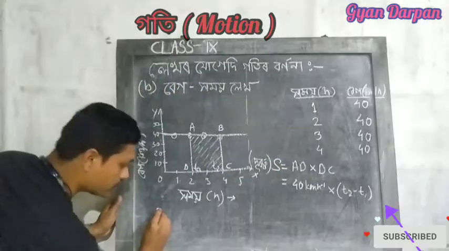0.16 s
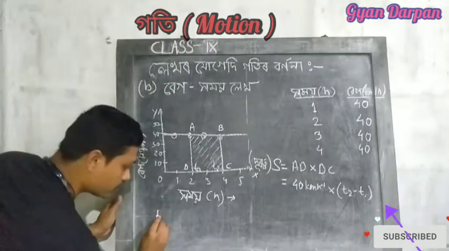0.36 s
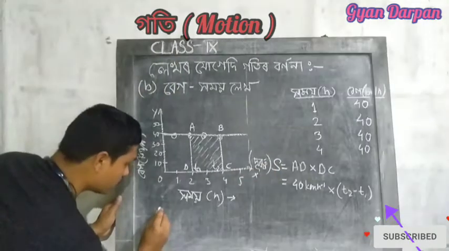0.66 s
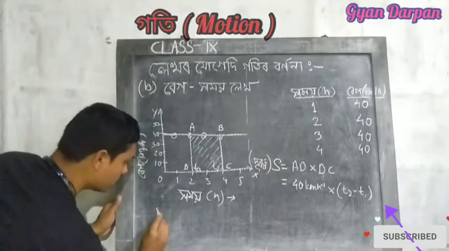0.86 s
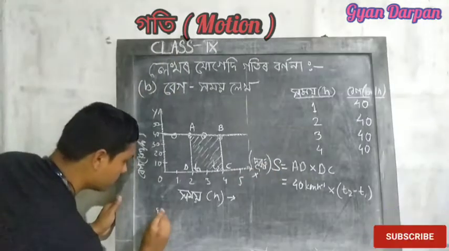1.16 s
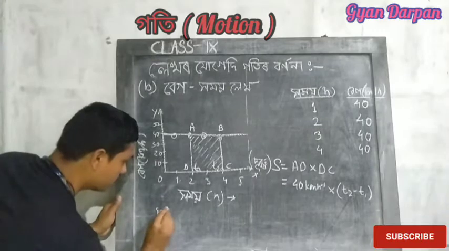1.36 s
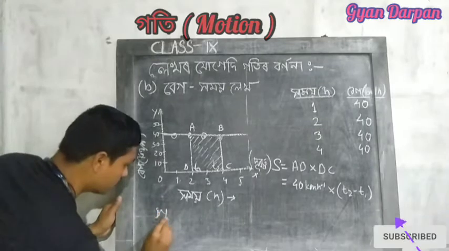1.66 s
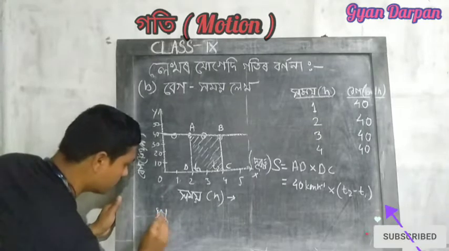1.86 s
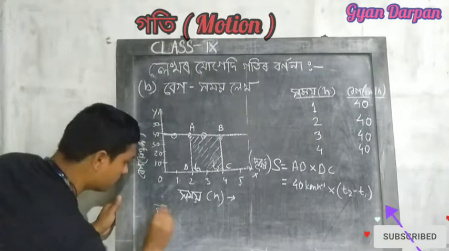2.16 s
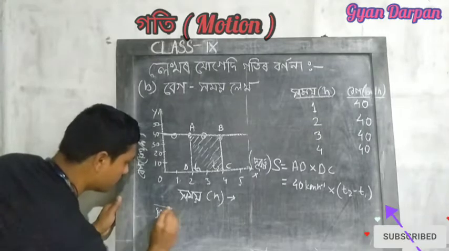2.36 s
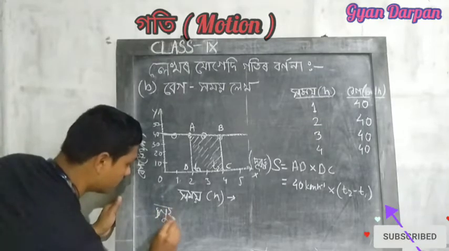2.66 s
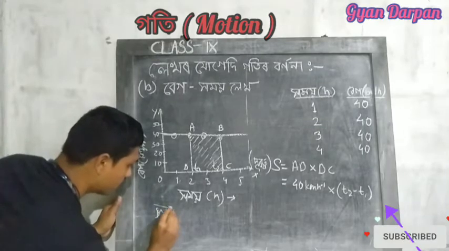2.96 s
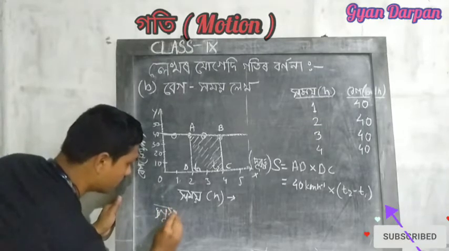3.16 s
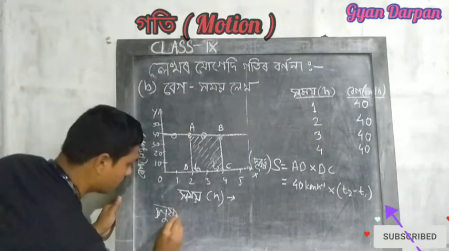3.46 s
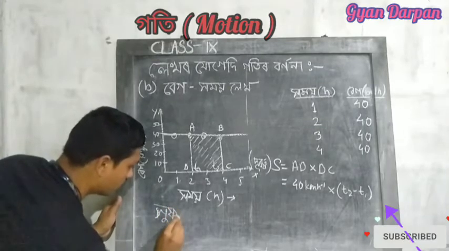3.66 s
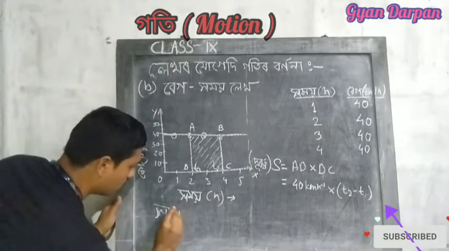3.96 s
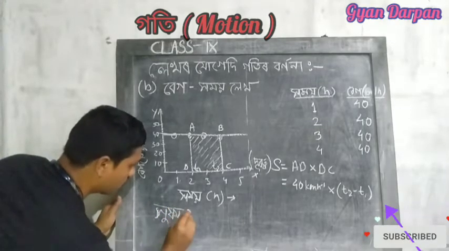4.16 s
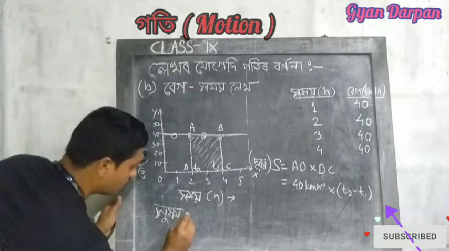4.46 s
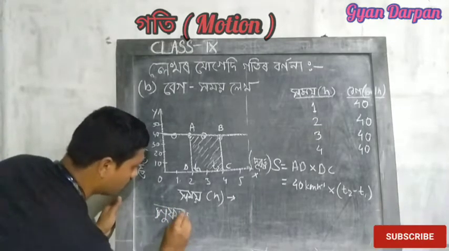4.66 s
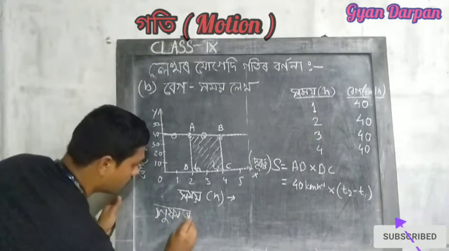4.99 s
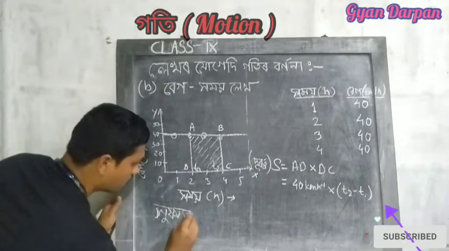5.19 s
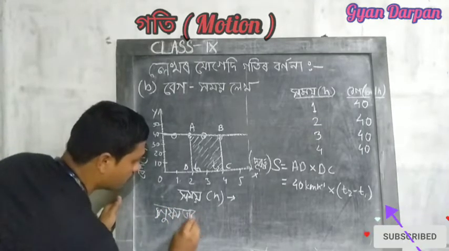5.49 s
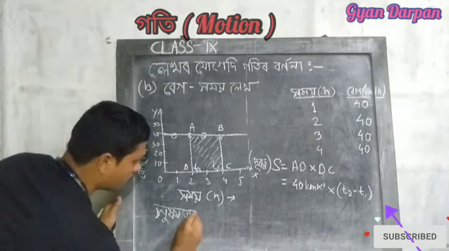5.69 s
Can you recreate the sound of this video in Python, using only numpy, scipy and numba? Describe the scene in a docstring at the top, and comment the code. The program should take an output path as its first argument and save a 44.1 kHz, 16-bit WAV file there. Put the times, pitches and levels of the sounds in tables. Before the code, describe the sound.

Chalk writes on a wooden blackboard in a small, bare room. It lands with sharp clicks and light knocks, often bouncing once, then drags in short, softer strokes that hiss and rasp, a few with a slight judder. Taps and scrapes alternate irregularly for about six seconds with brief, nearly silent gaps. A single microphone picks it up with a little room reverberation and limited bass and top end.

```python
"""A chalk stick writes on a wooden blackboard in a small bare room, heard by one narrow-band microphone.
Friction crushes grains, which hiss at the tip and force the modes of board and stick; stick-slip motion
makes the board judder. Each landing or bounce is an impact that leaves the same modes ringing freely.
The walls reverberate. Between strokes there is near silence, with a faint two-band chirr now and then."""
import sys
import numpy as np
from scipy import signal
from scipy.fft import rfft, irfft, next_fast_len
from scipy.io import wavfile
from numba import njit

SR = 44100
rng = np.random.default_rng(int(sys.argv[2]) if len(sys.argv) > 2 else 0)


def materialize(psi):
    """Save the field psi as 16-bit PCM at rate SR to the path in sys.argv[1].

    A 1-D psi becomes a single channel; in a 2-D psi each row is a channel.
    """
    bounded = np.clip(np.atleast_2d(psi).T, -1, 1)
    quanta = np.round(bounded * 32767).astype(np.int16)
    wavfile.write(sys.argv[1], SR, quanta)


N = 257279

# normal modes of board and stick: f/Hz, level/dB, nominal decay time/s (contact shortens it)
MODES = [(103, 1, 0.05), (151, -3, 0.22), (188, -7, 0.36), (225, 0.5, 0.25), (240, 1, 0.073),
         (385.3, 3, 0.14), (407.6, 0.5, 0.17), (480.7, -3.5, 0.05), (570, -6.5, 0.047), (739, -3.5, 0.052),
         (838, -3, 0.14), (866, -5, 0.14), (1012, -3.5, 0.095), (1058, -4.5, 0.083), (1181, -2, 0.087),
         (1321, -10, 0.054), (1413, -11, 0.1), (1543, -11, 0.14), (1700, -11.5, 0.071), (1982, -0.5, 0.14),
         (2275, 4.5, 0.058), (2640, 3.5, 0.076), (2890, -0.5, 0.052), (3270, -6, 0.056), (3250, -1, 0.0087),
         (3480, -7.5, 0.018), (3920, -14, 0.015), (4100, -13.5, 0.0098)]
THUD_TOP_HZ, BOARD_TOP_HZ = 480, 1800  # upper limits of the two lower mode families
BOARD_PIVOT_HZ, STICK_PIVOT_HZ = 900, 2600  # spectral tilts turn about these


def chalk_strokes():
    """Friction as a source: breaking grains and stick-slip motion drive resonances under a varying grip."""
    (hiss, rasp, scrape, judder), (judder_hz, board_tilt, stick_tilt) = hand_motion()
    fine, coarse = grains(per_s=9000, spread_db=2.5), grains(per_s=3000, spread_db=2.5)
    grip = undb(0.99 * walk(45) + 0.21 * walk(220))
    slips = undb(-9.5) * stick_slip(judder_hz) + unit(coarse)
    low, board, stick = forced_modes(slips, coarse, fine, judder_hz, board_tilt, stick_tilt)
    return grip * (hiss * tip_hiss(fine) + judder * low + scrape * board + rasp * stick)


def hand_motion():
    """Incoherent addition: strokes sum in power, which also weights their judder rate and tilts."""
    # t/s, duration/s, share of it to top speed, rise exponent, fall exponent, hiss level/dB,
    # rasp, scrape and judder level/dB re hiss, pressure change/dB, judder f/Hz,
    # board and stick tilt/(dB per octave)
    strokes = [(0.256, 0.25, 0.5, 0.57, 2.9, -50.5, -2, 3.5, 0.5, 0.5, 283, 0, 3),
               (0.809, 0.22, 0.61, 0.86, 0.62, -44.5, -3.5, 2, -4, -0.5, 283, 0, 4.5),
               (1.009, 0.26, 0.474, 3.6, 5.7, -43, -2.5, 6, 2.5, 9.5, 225.0, 1, 1.5),
               (1.227, 0.16, 0.37, 1.2, 1.93, -43, -1, -0.5, -3.5, -0.5, 346.1, 2, 2),
               (1.313, 0.18, 0.39, 3.4, 3.74, -48.5, 1.5, 7, 8.5, 3.5, 220.5, -3, -11.5),
               (1.48, 0.1773, 0.57, 1.16, 1.5, -41.5, -3.5, -1, -2.5, 0, 321, 0.5, 2),
               (1.634, 0.19, 0.2, 1.65, 1.3, -48, -2, 3, 7.5, 0.5, 263.3, -4.5, -6.5),
               (1.728, 0.17, 0.43, 1.3, 2.27, -45.5, -1, -1, -6.5, 15.5, 344.8, -6, 3.5),
               (1.866, 0.046, 0.5, 1.5, 2.5, -72, 14.5, 14, 9, 1.5, 370.6, -8, 1.5),
               (2.165, 0.2, 0.48, 1.6, 1.92, -37, -1.5, -1, -9.5, 13, 379.8, -0.5, 0),
               (2.354, 0.024, 0.3, 5, 2.7, -59.5, 7, -5, 15.5, -3, 317, 0.5, 0.5),
               (2.439, 0.16, 0.38, 0.75, 0.41, -46, -2.5, -6.5, -7, 4, 249.4, -2.5, 6.5),
               (2.623, 0.165, 0.44, 0.96, 3.3, -45, -3.5, -1.5, -3.5, 14.5, 361.9, -5.5, 3.5),
               (2.792, 0.21, 0.44, 1.6, 0.83, -44.5, -0.5, 6, 15.5, 0.5, 188.2, -4.5, -5),
               (3.071, 0.155, 0.23, 0.71, 0.51, -47.5, -1, -2.5, -13.5, 9.5, 374, 4, 1),
               (3.387, 0.17, 0.36, 1.2, 1.6, -42.5, -3.5, -1.5, -6, -6, 329.8, -0.5, 1.5),
               (3.466, 0.022, 0.2404, 1.9, 1.7, -40, -1, 1, -2.5, 5.5, 326, 2.5, 5.5),
               (3.497, 0.16, 0.5, 1, 0.81, -53.5, -2.5, 5.5, 5.5, -16.5, 299, -0.5, 0),
               (3.66, 0.13, 0.44, 1.7, 5.1, -45.5, -9.5, -10, -7.5, 6.5, 359, -6.5, -7),
               (3.792, 0.19, 0.7, 1.3, 3.5, -44, -3.5, 5, 9.5, 7, 254, -0.5, -8),
               (4.084, 0.15, 0.5, 0.92, 1.9, -42.5, -1, -1.5, -23, 2, 322.7, 9.5, 2.5),
               (4.178, 0.033, 0.52, 2.6, 1.7, -43.5, 2, 9, -12.5, 3.5, 376, 6.5, 8.5),
               (4.405, 0.1, 0.31, 4.2, 2.2, -58.5, -4.5, 2.5, -8, -28.5, 344, -1.5, 6),
               (4.478, 0.15, 0.54, 2.1, 2.9, -43.5, -6, -6.5, -21, 6, 318.4, 3.5, 3),
               (4.58, 0.23, 0.45, 3, 1.8, -43.5, -2.5, 6, 1.5, 4, 118.2, 1, 1),
               (4.772, 0.17, 0.72, 4.1, 3.5, -43.5, -4, -1.5, -8.5, 0.5, 280.3, 7, 20),
               (4.991, 0.21, 0.38, 1.2, 2.2, -42, -9, -6.5, -17.5, 4, 319, 0, 4),
               (5.175, 0.037, 0.71, 0.93, 2.9, -58.5, 2.5, 4, -8, 0, 326, 2, 4.5),
               (5.359, 0.13, 0.58, 1.8, 0.63, -44.5, 1.5, 3.5, -6, 3, 236.3, 2, 0.5),
               (5.504, 0.204, 0.55, 0.4, 0.83, -46, -2.5, -6.5, -16.5, 5, 298.5, 0.5, 2.5),
               (5.532, 0.014, 0.37, 2.7, 1.9, -52, 7, -8, -15, 2.5, 343, 5, -1),
               (5.681, 0.032, 0.43, 2.9, 0.94, -51, 6.5, 5.5, -8, -1.5, 331, 12, -13.5)]
    follows_speed, follows_pressure = (0.95, 0.9, 0.84, 0.94), (0.063, .6, 0.91, 1.1)
    sag_oct_per_db = 0.16  # the judder slows as the chalk presses harder
    power, colour = np.full((4, N), 1e-14), np.zeros((3, N))  # power rows: hiss, rasp, scrape, judder
    colour[0] = 3e-12  # the judder rate rests at 300 Hz
    for (start, length, rise, exp_in, exp_out, hiss_db, rasp_db, scrape_db, judder_db,
         press_db, hz, board_tilt, stick_tilt) in strokes:
        i, done, speed = arch(start, length, rise)
        exponent = np.where(done < rise, exp_in, exp_out)
        pressure_db = press_db * (done - .5)
        judder_hz = hz * 2 ** (-sag_oct_per_db * pressure_db)
        for k, db in enumerate((0, rasp_db, scrape_db, judder_db)):
            gain = undb(hiss_db + db + follows_pressure[k] * pressure_db)
            layer = (gain * speed ** (exponent * follows_speed[k])) ** 2
            power[k, i] += layer
            if k:
                colour[3 - k, i] += layer * (stick_tilt, board_tilt, judder_hz)[k - 1]
    return np.sqrt(power), colour / power[:0:-1]


def grains(per_s, spread_db):
    """Brittle fracture as a Poisson process: grains break at random moments, a few with great force."""
    chance, side, size = rng.random((3, N))
    return (chance < per_s / SR) * np.sign(side - .5) * undb(-spread_db * np.log(1 - size))


def stick_slip(hz):
    """Relaxation oscillation: the chalk sticks and slips, one pulse a cycle, never quite evenly."""
    cycles = np.cumsum(hz * (1 + 0.067 * walk(60))) / SR
    return unit(np.diff(np.floor(cycles), prepend=0) * undb(1.5 * walk(89)))


def forced_modes(slips, coarse, fine, judder_hz, board_tilt, stick_tilt):
    """Forced vibration: the contact damps the modes and wanders, so each swells and drifts alone."""
    families = np.zeros((3, N))
    shortening = wear(rise_per_s=0.0037)
    for k, (hz, db, decay) in enumerate(MODES):
        kind = family(hz)
        width_hz = (7, 11, 16)[kind] / decay
        drift = 1 + (0.024, 0.03, 0.04)[kind] * walk(7)
        centre = tune(hz * drift * (shortening if kind == 2 else 1))
        drive = (slips, coarse, np.roll(fine, -k * SR // 50))[kind]  # other grains for each stick mode
        ring = resonate(drive, centre, width_hz / hz)
        if kind == 0:  # the judder favours low modes near its own rate
            db = db - 15 * np.abs(np.log2(hz / judder_hz))
        elif kind == 1:
            db = db + board_tilt * np.log2(hz / BOARD_PIVOT_HZ)
        else:
            db = db + stick_tilt * np.log2(hz / STICK_PIVOT_HZ)
        # neighbours swing in antiphase, which fills the valleys between them
        families[kind] += (-1) ** k * ring * undb(db + (1.5, 2.2, 2.6)[kind] * walk(16))
    return [unit(x) for x in families]


def tip_hiss(fine):
    """Filtered shot noise: each band at the tip takes other grains, so neighbours do not cancel."""
    # f/Hz, bandwidth/Hz, level/dB
    tip_bands = [(4270, 830, -10), (5010, 700, -4), (5760, 910, -2), (6260, 620, 3.5), (6940, 770, 3),
                 (7290, 200, -6.5)]
    hiss, climb = 0, wear(rise_per_s=0.011)
    for k, (hz, width_hz, db) in enumerate(tip_bands):
        centre = tune(hz * climb * (1 + 0.025 * walk(15)))
        gain = undb(db + 2.0 * walk(30) + 1.7 * walk(150))
        hiss = hiss + gain * resonate(np.roll(fine, k * SR // 20), centre, width_hz / hz)
    return unit(hiss)


def wear(rise_per_s):
    """A shorter bar resonates higher: the frequency ratio climbs as the stick wears down."""
    return 1 + rise_per_s * (np.arange(N) - N / 2) / SR


def knocks():
    """Impact excitation: the force pulse is convolved with the modal response, then with the room's."""
    # landings and bounces: t/s, level/dB, relative thud, click and room level/dB,
    # board tilt/(dB per octave)
    impacts = [(0.128, -43, -8, -16, -0.5, 0), (0.135, -34, -25, -11.5, 7, -5.5),
               (0.586, -47, -12, -12.5, -5, 3), (0.64, -39.5, -11.5, -28.5, 1, -5.5),
               (.773, -14, -11, -9, -5.5, 2), (0.781, -17.5, -18, -14.5, -2.5, 8.5),
               (2.004, -41, -7, -27.5, 3, -15), (2.1205, -14.5, -17, -12, -4.5, -5),
               (2.13, -22, -18.5, -10.5, -3, 11), (2.41, -23, -7, -16, -4.5, -10),
               (2.451, -32, -13, -23.5, 9.5, 6), (3.076, -13.5, -14, -8.5, -11, 5.5),
               (3.084, -19.5, -11.5, -8.5, -4.5, 11.5), (3.216, -50.5, -24, -17, -1.5, 13),
               (3.318, -20.5, -7.5, -9, -1, 11), (3.351, -20.5, -17, -13.5, -4.5, 4.5),
               (3.359, -14.5, -11, -23.5, -4.5, 6), (3.814, -29, -17, -42.5, 10, 8),
               (4.019, -19.5, -8, -9.5, -4.5, 13), (4.026, -26, -11, -12, -1.5, 12),
               (4.051, -29, -22, -16.5, 2.5, 5), (4.06, -24, -22.5, -24.5, 1, -2),
               (4.192, -36.5, -24.5, -20.5, -26, 1.5), (4.284, -44, -11.5, -26, 1.5, -1),
               (4.32, -14.5, -26.5, -13, -12, 20), (4.326, -23, -10, -16, -9.5, 5),
               (5.357, -15.5, -27.5, -11, -2, 8.5), (5.365, -17.5, -12, -21, 0, 1.5),
               (5.699, -49.5, -23, 0, -6, 14), (5.759, -40, -16, -26, -2, -12),
               (5.819, -12, -43, -10.5, -6.5, -4)]
    out, t = np.zeros(N + SR), np.arange(SR // 7) / SR
    spots = rng.standard_normal((len(impacts), 3, len(MODES)))
    cracks = rng.standard_normal((len(impacts), len(t)))
    radiation = signal.butter(1, 300, "high", fs=SR, output="sos")  # slow motion radiates poorly
    softness = signal.butter(6, 7000, fs=SR, output="sos")  # soft chalk has little above this
    for impact, spot, crack, tail in zip(impacts, spots, cracks, room_responses(len(impacts))):
        start, db, thud_db, click_db, room_db, tilt = impact
        ring = free_modes(t, spot, thud_db, click_db, tilt)
        struck = np.convolve(ring, contact_force(t, crack, click_db))[:len(t)]
        blow = signal.sosfilt(softness, signal.sosfilt(radiation, struck) + tip_snap(t, crack, click_db))
        heard = undb(room_db) * signal.fftconvolve(blow, tail)
        heard[:len(t)] += blow
        i = int(start * SR)
        out[i:i + len(heard)] += undb(db - 16.5) * heard
    return out[:N]


def free_modes(t, spot, thud_db, click_db, tilt):
    """Modal superposition: damped sinusoids ring with weights that depend on the spot struck."""
    ring = 0
    for (hz, db, decay), (weight, detune, split) in zip(MODES, spot.T):
        family_db = (thud_db + 2.5, tilt * np.log2(hz / BOARD_PIVOT_HZ), click_db + 6.5)[family(hz)]
        # every mode has a close twin, so the knock is dense rather than pitched
        phase = 2 * np.pi * hz * t
        twins = np.sin(phase * (1 + 0.041 * detune)) + np.sin(phase * (1 + 0.056 * split))
        ring = ring + twins * undb(db + 2.1 * weight + family_db - 60 * t / (0.21 * decay))
    return ring


def contact_force(t, crack, click_db):
    """Contact time limits bandwidth: a softer touch pushes longer; the tip then crumbles briefly."""
    half_width_s = 0.0002 * undb(-.8 * (click_db + 11.0))
    push = np.clip(1 - np.abs(np.arange(-40, 41) / SR) / half_width_s, 0, 1) ** 2
    crumble = undb(-27) * crack[::-1] * np.exp(-t / .008)
    return np.convolve(push / push.sum(), np.r_[1, crumble[:SR // 25]])


def tip_snap(t, crack, click_db):
    """A broadband transient: the bright crack decays fast and leaves a duller, longer rattle."""
    bright = band(band(crack, 5400, 2200), 5400, 2200) * (1 - np.exp(-t / 0.00069))
    rattle = band(np.roll(crack, SR // 20), 3200, 3500)
    return bright * undb(click_db + 14.5 - 60 * t / 0.02) + rattle * undb(click_db - 12 - 60 * t / 0.091)


def room_responses(count):
    """Reverberation: after a short gap the walls return a diffuse tail, different for every spot."""
    # f/Hz, reverberation time T60/s, level/dB
    room_bands = [(208, 0.43, -7.5), (475, 0.24, 3), (900, 0.13, 7.5), (1380, 0.13, 9), (1970, 0.11, 1.5),
                  (3280, 0.38, -7), (4860, 0.069, -9.5), (6600, 0.2, -2)]
    first_wall_s, echo_db = 0.009, -18.5
    early_db, early_t60_s = -5.5, 0.024  # early reflections stand above the tail
    t, tails = np.arange(SR // 3) / SR, 0
    for hz, t60, db in room_bands:
        noise = unit(band(rng.standard_normal(len(t) * 4), hz, 1.07 * hz))
        starts = (rng.random(count) * len(t) * 3).astype(int)
        tails = tails + undb(db - 60 * t / t60) * noise[starts[:, None] + np.arange(len(t))]
    onset = np.clip((t - first_wall_s) / 0.006 + 1, 0, 1)
    late = np.maximum(t - first_wall_s, 0)
    tails *= onset * (1 + undb(early_db - 60 * late / early_t60_s))
    tails /= np.sqrt(np.sum(tails ** 2, axis=1, keepdims=True))
    tails[:, int(first_wall_s * SR)] += undb(echo_db)  # one clear echo from the nearest wall
    return tails


def chirr():
    """Amplitude modulation roughens two narrow noise bands; the first sags in pitch as it goes."""
    # t/s, duration/s, first band starting f/Hz, level/dB, second band f/Hz, level/dB
    chirrs = [(-.04, .17, 3150, -66.5, 3480, -76.5), (0.601, 0.49, 3080, -66, 5550, -68.5),
              (1.983, 0.27, 3120, -84.5, 2250, -100.5), (2.735, 0.07, 3120, -80, 5740, -68),
              (3.722, 0.071, 3170, -83, 5800, -62), (5.718, 0.14, 3000, -72, 5720, -80)]
    sag_hz_per_s = 1760
    hz, gain = np.full((2, N), 3000.), np.zeros((2, N))
    for start, length, first_hz, first_db, second_hz, second_db in chirrs:
        i, done, swell = arch(start, length, rise=0.18)
        hz[0, i], hz[1, i] = first_hz - sag_hz_per_s * length * done, second_hz
        gain[:, i] = undb([[first_db], [second_db]]) * swell ** 0.98
    out = 0
    for centre, level, width in zip(tune(hz), gain, (0.2, 0.11)):
        roughness = undb(2.8 * walk(60))
        out = out + level * roughness * resonate(rng.standard_normal(N), centre, width, stages=3)
    return out


def noise_floor():
    """Spectrally shaped Gaussian noise forms a faint, flickering background."""
    # f/Hz, relative spectral density level/dB
    spectrum = [(60, -16.5), (125, 11.5), (273, -12.5), (825, -3), (1400, -14), (1830, -12), (4300, -25.5),
                (8000, -37.5)]
    hz, db = np.transpose(spectrum)
    size = next_fast_len(N)
    f = np.maximum(np.arange(size // 2 + 1) * SR / size, 1)
    shape = undb(np.interp(np.log(f), np.log(hz), db))
    noise = irfft(rfft(rng.standard_normal(size)) * shape, size)[:N]
    return unit(noise) * undb(-75 + 2.2 * walk(3.9))


def family(hz):
    """Mode family: 0 for low thud modes, 1 for board modes, 2 for stick modes."""
    return int(hz > THUD_TOP_HZ) + int(hz > BOARD_TOP_HZ)


def arch(start_s, length_s, rise):
    """Envelope of an event: its samples, the share elapsed, and a swell from 0 to 1 and back."""
    i = np.arange(max(int(start_s * SR) + 1, 0), min(int((start_s + length_s) * SR), N))
    done = (i / SR - start_s) / length_s
    return i, done, np.sin(np.pi / 2 * np.minimum(done / rise, (1 - done) / (1 - rise)))


def walk(rate):
    """Random modulation: rate values a second, joined by straight lines; spread near 1."""
    return np.sqrt(1.5) * np.interp(np.arange(N) * (rate / SR), np.arange(2000), rng.standard_normal(2000))


def resonate(x, centre, width, stages=2):
    """Resonators in cascade steepen the skirts of a band; the output has rms 1."""
    for _ in range(stages):
        x = svf(x, centre, width)
    return unit(x)


@njit
def svf(x, g, k):
    """Second-order resonance, gain 1 at its moving centre g = tune(hz); k is width over centre."""
    y, mid, low = np.empty(len(x)), 0., 0.
    for i in range(len(x)):
        v = (mid + g[i] * (x[i] - low)) / (1 + g[i] * (g[i] + k))
        mid, low, y[i] = 2 * v - mid, low + 2 * g[i] * v, k * v
    return y


def band(x, hz, width_hz):
    """Band-pass resonance with a steady centre."""
    return svf(x + 1e-18, np.full(len(x), tune(hz)), width_hz / hz)


def tune(hz):
    """Bilinear prewarping: the filter coefficient of a centre frequency."""
    return np.tan(np.pi * hz / SR)


def undb(db):
    """Amplitude ratio of a level in dB."""
    return np.exp(np.asarray(db) * np.log(10) / 20)


def unit(x):
    """Normalise to rms 1."""
    return x / np.sqrt(np.mean(x ** 2))


def scene():
    """Superposition of direct sound, reverberation and background, the same on both channels."""
    rub, taps = chalk_strokes(), knocks()
    # directivity: the tip throws its treble sideways, so the walls get more of it
    to_walls = undb(-16.5) * rub + undb(-17) * band(rub, 5200, 4800)
    reverberation = signal.fftconvolve(to_walls, room_responses(count=1)[0])[:N]
    mono = rub + taps + reverberation + chirr() + noise_floor()
    return np.array([mono, mono])


def record(dry):
    """Band limiting: the microphone chain drops the deep bass, fades near its top, then cuts steeply."""
    dry = signal.sosfilt(signal.butter(2, 120, "high", fs=SR, output="sos"), dry)
    dry = signal.sosfilt(signal.butter(8, 7900, fs=SR, output="sos"), dry)
    return signal.sosfilt(signal.ellip(14, .5, 80, 8200, fs=SR, output="sos"), dry)


dry = scene()
out = record(dry)
materialize(out)
```